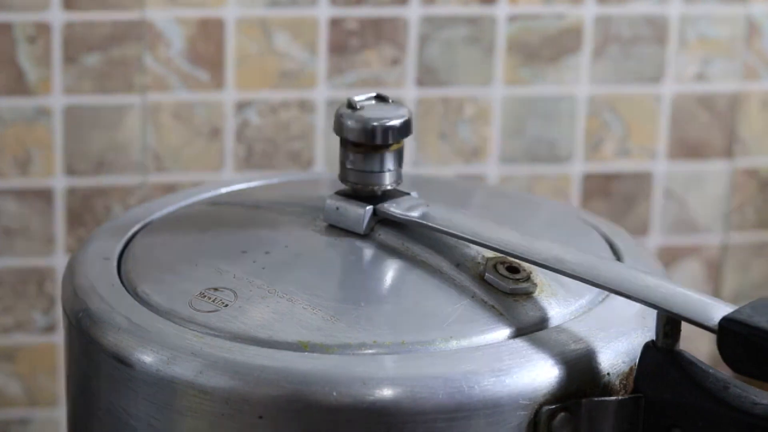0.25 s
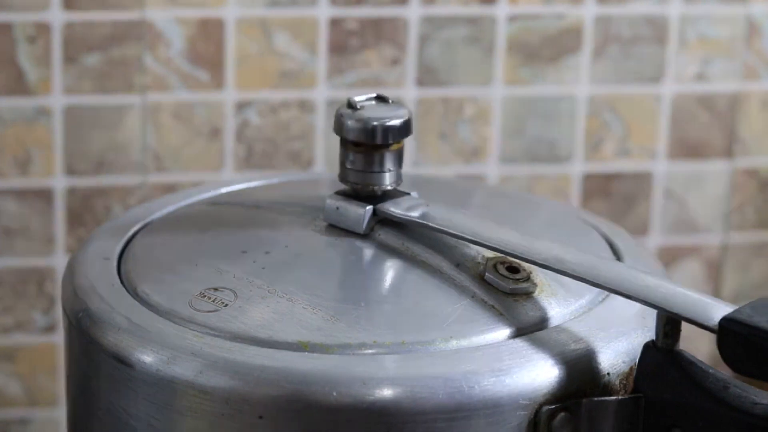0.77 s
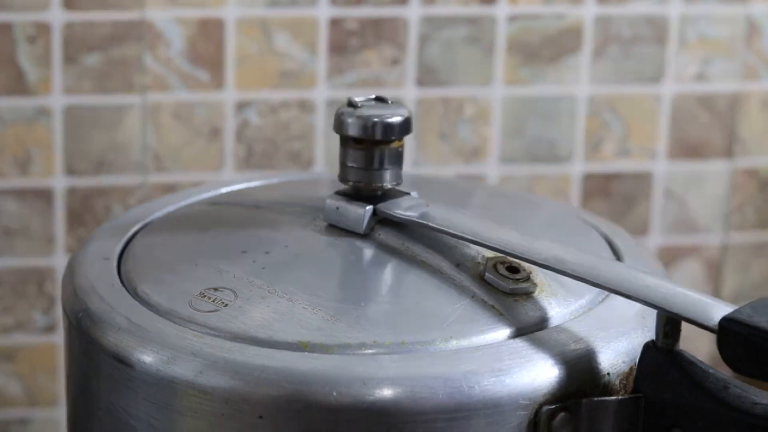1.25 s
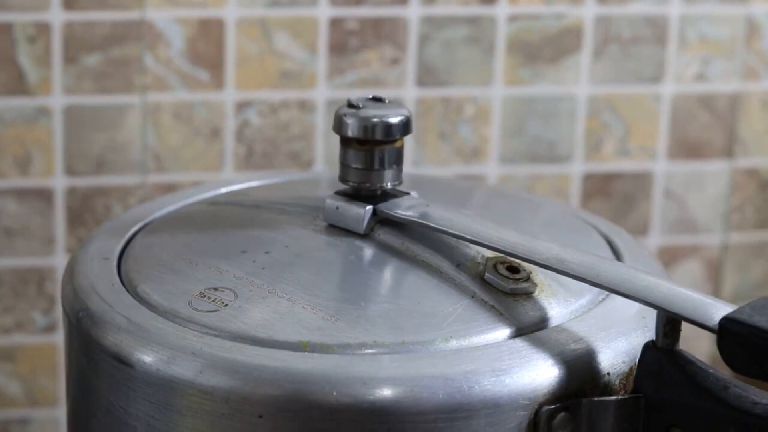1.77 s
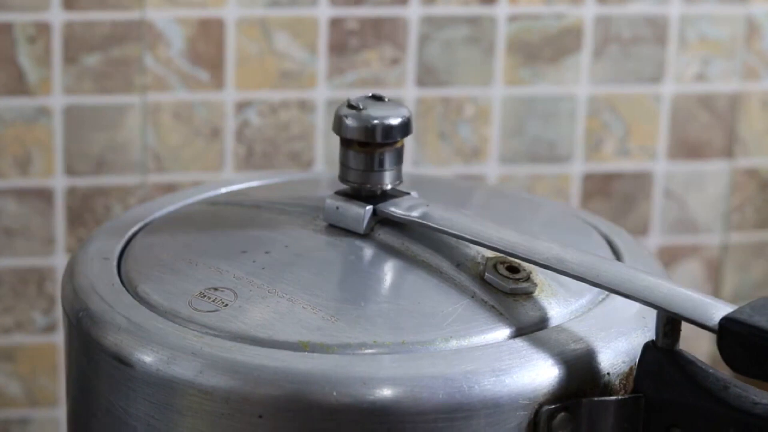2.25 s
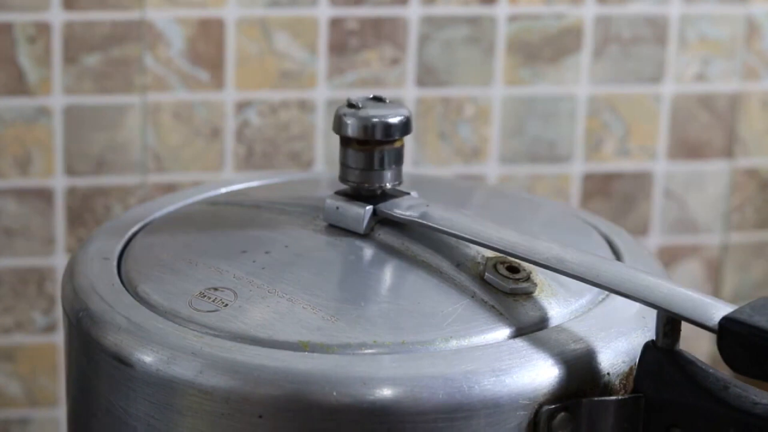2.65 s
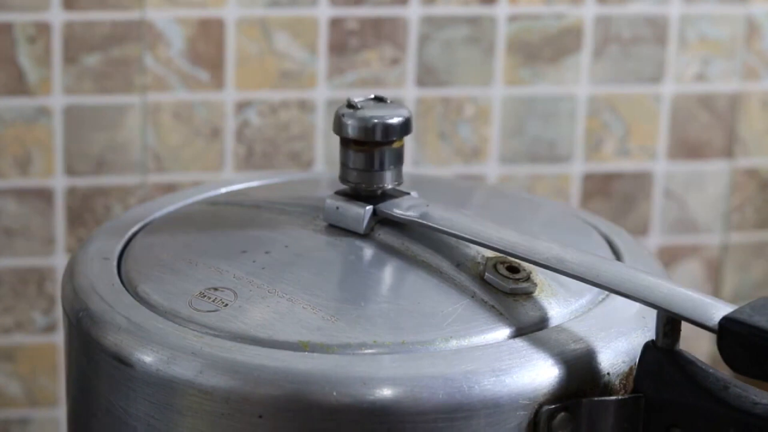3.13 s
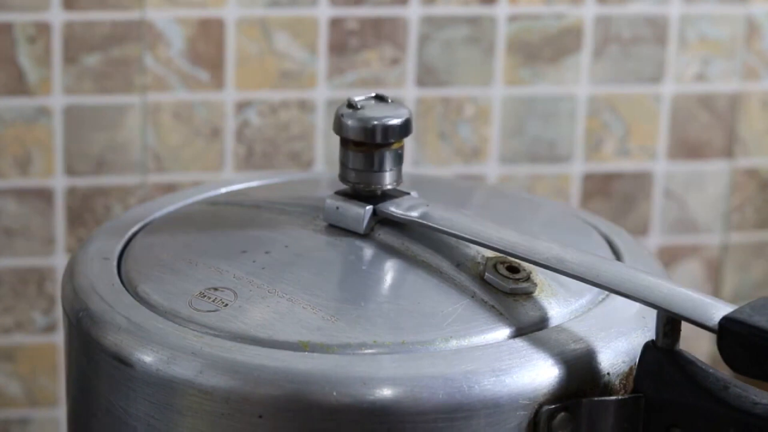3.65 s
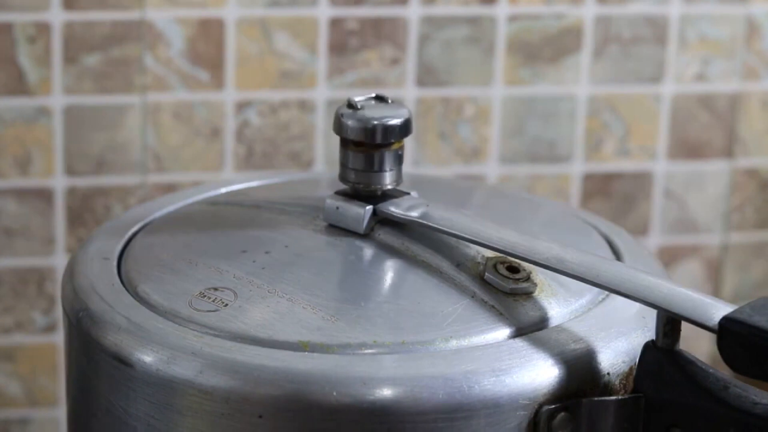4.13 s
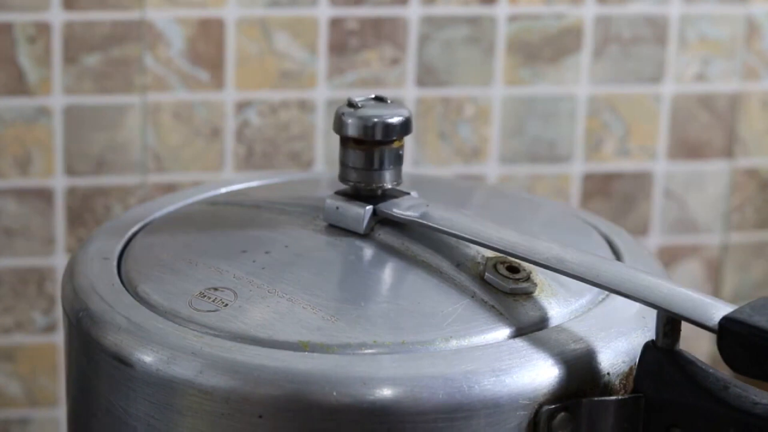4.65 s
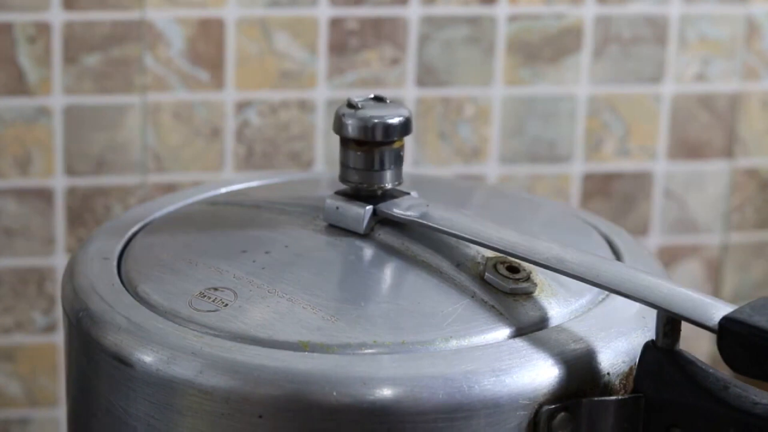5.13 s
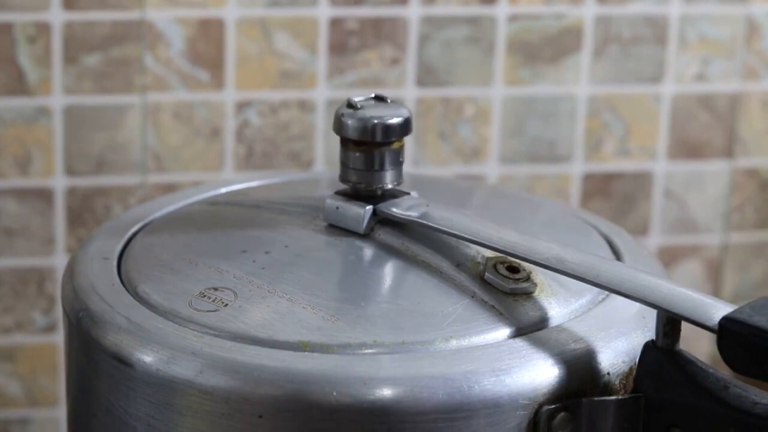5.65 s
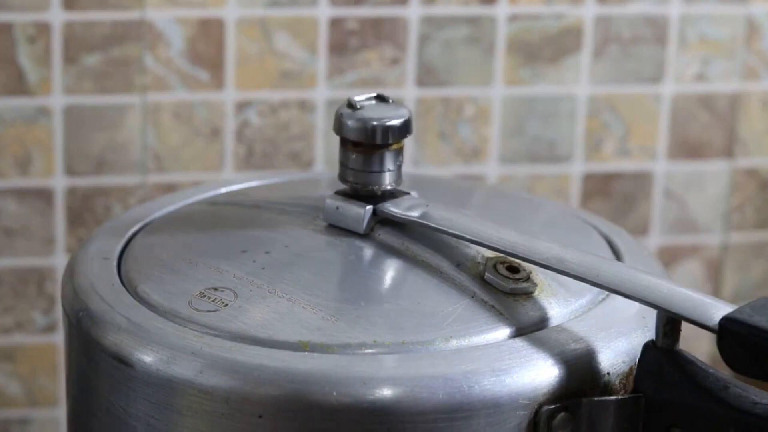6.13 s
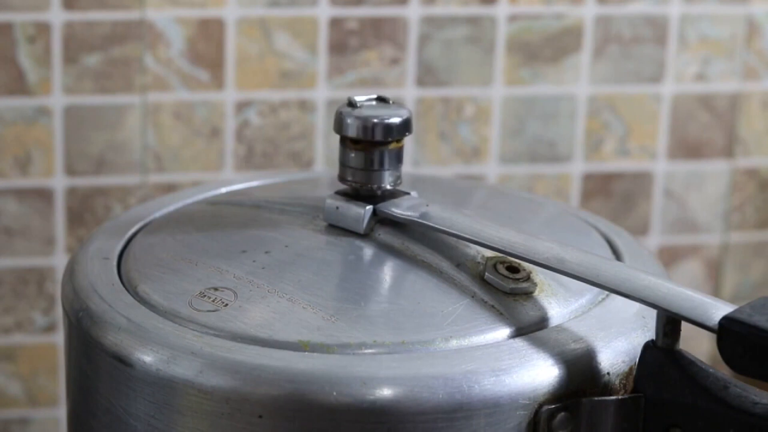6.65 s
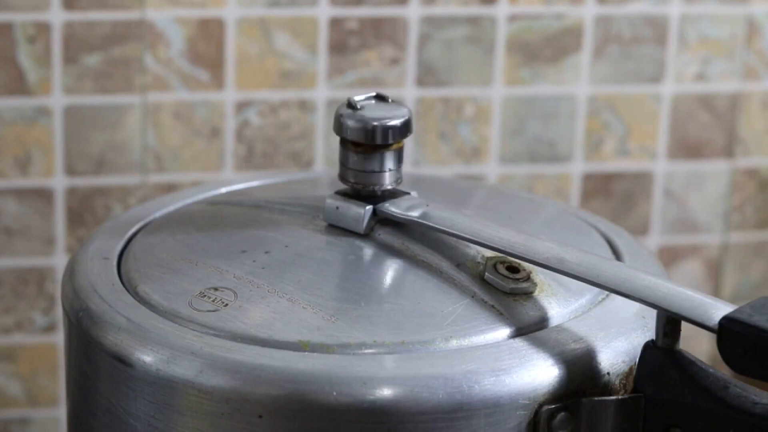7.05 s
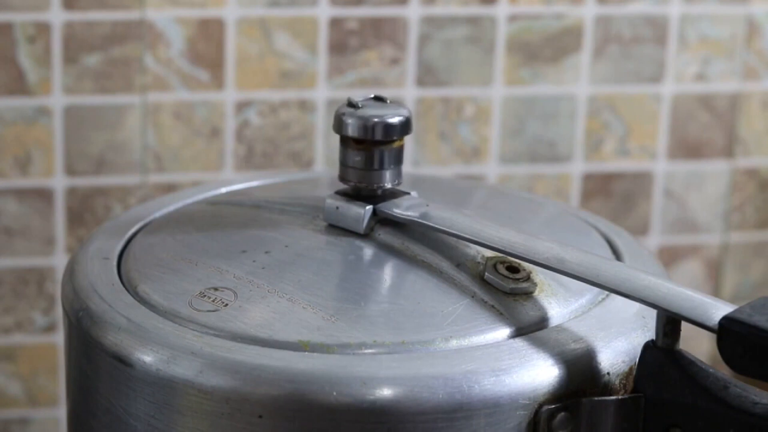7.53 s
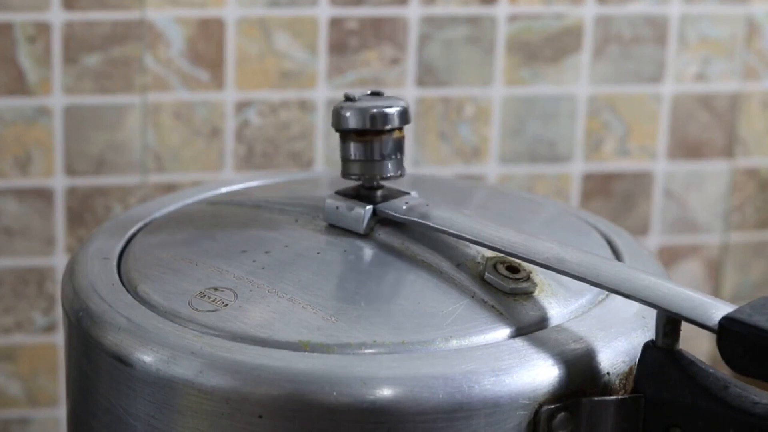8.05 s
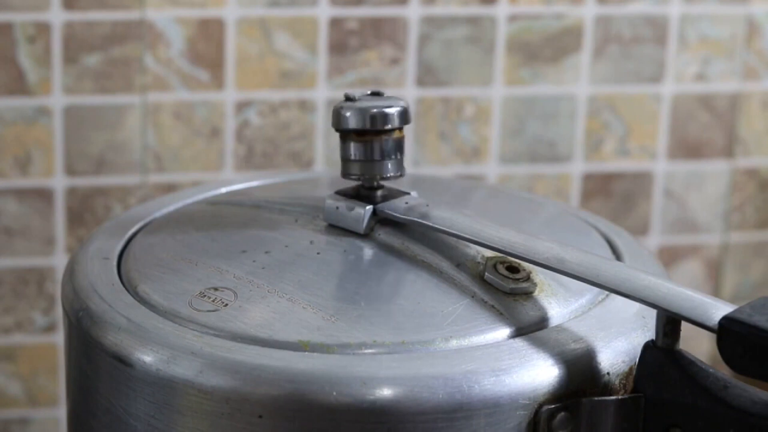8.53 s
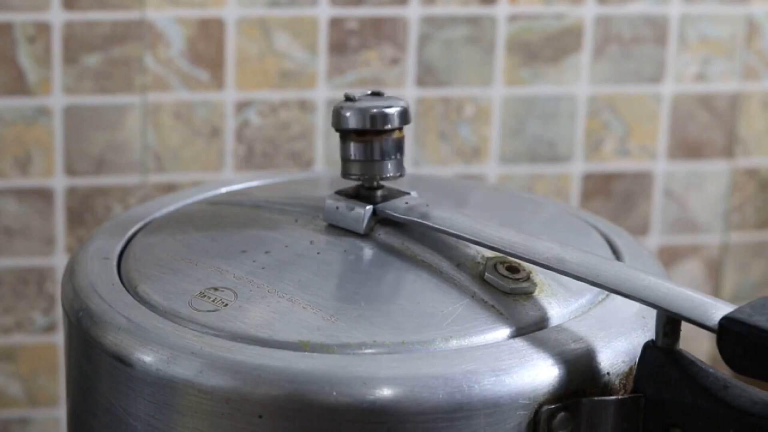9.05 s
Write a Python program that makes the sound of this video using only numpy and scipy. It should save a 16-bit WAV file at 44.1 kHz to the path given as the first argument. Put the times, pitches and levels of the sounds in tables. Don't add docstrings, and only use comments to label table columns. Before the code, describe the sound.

Close pressure cooker valve rocks, puffing steam in quick strong-and-weak hisses, then lifts into a steady loud blast over faint kitchen hum.

```python
import sys
import numpy as np
from scipy import signal
from scipy.fft import rfft, irfft
from scipy.io import wavfile
from scipy.ndimage import uniform_filter1d

SR = 44100
rng = np.random.default_rng(int(sys.argv[2]) if len(sys.argv) > 2 else 0)


def voltage_ratio(level):
    return 10 ** (np.asarray(level, float) / 20)


def int16_out(signal):
    q = np.round(np.clip(np.atleast_2d(signal).T, -1, 1) * 32767)
    wavfile.write(sys.argv[1], SR, q.astype(np.int16))


N = 409688
HZ = np.arange(N // 2 + 1) * SR / N + 1e-3
TIME = np.arange(N) / SR


def level(x, db):
    return x * voltage_ratio(db) / np.sqrt(np.mean(x ** 2))


def along(table):
    hz, value = np.transpose(table)
    return np.interp(np.log(HZ), np.log(np.maximum(hz, 1)), value)


def resonances(modes):
    return sum(db / (1 + (2 * (HZ - hz) / width) ** 2) for hz, width, db in modes)


def noise(db, alike=1):
    mid, side = rfft(rng.standard_normal((2, N)))
    alike = np.clip(alike, 0, 1)
    common = np.sqrt(1 + alike) * mid
    opposed = np.sqrt(1 - alike) * side * np.array([[1], [-1]])
    return level(irfft((common + opposed) * voltage_ratio(db), N), 0)


def walk(rate):
    k = int(SR / rate)
    held = np.repeat(rng.standard_normal(N // k + 1), k)
    return 1.28 * uniform_filter1d(uniform_filter1d(held, k), k)[:N]


# (frequency [Hz], density [dB per Hz])
LEAD = [(18, -38), (30, -18), (291, -4), (663, -13.5), (775, -30), (952, -16), (1060, -19), (14300, -49)]
# (frequency [Hz], density [dB per Hz])
HUSH = [(18, -46), (30, -16), (243, 3), (367, -6), (474, -5), (775, -15), (1550, -16), (14300, -45)]
LEAD_DB, HUSH_DB = -38, -60.5
TICK_S, HUSH_S = .018, .058
LEAD_TOP_HZ = 14400


def lead_in():
    hushed = np.clip((TIME - HUSH_S) / 0.0014, 0, 1)
    dull = -60 * (HZ > LEAD_TOP_HZ)
    loud_air = noise(along(LEAD) + dull, alike=0.52) * voltage_ratio(LEAD_DB) * (1 - hushed)
    hushed_air = noise(along(HUSH) + dull, alike=1.0) * voltage_ratio(HUSH_DB)
    tick_shape = np.exp(-((TIME - TICK_S) / 0.0011) ** 2)
    tick = noise(resonances([(5000, 7000, 32)])) * tick_shape * voltage_ratio(-42)
    return loud_air + hushed_air + tick


# (time [s], height [0-1])
LIFT = [
    (8.13, 0),
    (8.19, 0.43),
    (8.32, 0.47),
    (8.345, .98),
]


def height():
    return np.interp(TIME, *np.transpose(LIFT))


# (time seated [s], leak [dB], puff [dB], brightness [dB])
STRONG = [(0.1, -39, -22.5, 1.5), (0.382, -33.5, -21.6, -2.5), (0.686, -31.8, -22, 1),
          (0.983, -31.5, -21.5, 0), (1.258, -31, -22.1, 1.5), (1.562, -32, -22.5, 2), (1.856, -30, -23, 2),
          (2.115, -32.6, -20.5, -3), (2.392, -34.5, -22, 1.5), (2.651, -34, -22, -1),
          (2.917, -32.5, -21.5, -2.5), (3.205, -32.5, -21.5, -3.5), (3.502, -30.5, -21.5, -.3),
          (3.777, -36, -20.5, -2.5), (4.034, -33, -22, -1.5), (4.348, -32, -22, 0.5),
          (4.62, -32.5, -22, 2.1), (4.902, -31.5, -22, -2.5), (5.219, -30, -21, -1.5),
          (5.515, -32.5, -21.3, 0), (5.788, -34, -22.9, 3), (6.025, -33.5, -22.0, -1.5),
          (6.322, -31.1, -21.5, -2.5), (6.6, -30.5, -22.5, 0.5), (6.916, -34.5, -21.4, .6),
          (7.197, -32, -22, 3.5), (7.482, -31, -21.6, 1), (7.806, -30, -21.0, -1.5)]
# (time seated [s], leak [dB], puff [dB], brightness [dB])
WEAK = [(0.261, -35.5, -25, -2), (0.557, -36.5, -26.5, -.3), (0.854, -32, -22, -.8),
        (1.14, -32.5, -24.9, 2), (1.434, -34.5, -24.5, -2), (1.721, -32.5, -22.5, -2),
        (2.005, -28.7, -23, -1.5), (2.279, -29.5, -22.5, -1.5), (2.534, -33.2, -22.5, .3),
        (2.82, -31, -24, 0.5), (3.092, -35, -25, .3), (3.38, -32, -23.8, 2), (3.647, -28.5, -22.5, 1.5),
        (3.92, -30.5, -25.5, -0.5), (4.229, -36.5, -23, 2.5), (4.518, -33.5, -24, -3),
        (4.782, -33, -25.5, 1), (5.094, -32.5, -22.6, -.4), (5.379, -31, -22.5, 0.5),
        (5.653, -29, -22.9, 0), (5.934, -34, -27.5, 0), (6.201, -32, -24.5, 2.5), (6.479, -33, -25.4, .6),
        (6.786, -32, -23.7, 0.5), (7.065, -35.1, -23.4, -2), (7.369, -34.2, -24, -2.5),
        (7.671, -34.5, -22.5, -.6), (7.974, -30.5, -24, .3)]
# (time [s], jet level [dB])
BLAST = [
    (8.1, -34.5),
    (8.125, -22),
    (8.17, -20),
    (8.3, -22.2),
    (8.59, -22),
    (8.615, -26),
    (8.65, -22),
    (8.92, -23),
    (9.29, -23.5),
]
STRONG_OPENS, STRONG_CLOSES, WEAK_OPENS, WEAK_CLOSES = 0.25, .6, 0.36, 0.6
TOP_DB = -1.5


def valve():
    seated, leak_db, puff_db, bright_db = np.reshape(np.hstack([STRONG, WEAK]), (-1, 4)).T
    blast_s, blast_db = np.transpose(BLAST)
    length = np.diff(np.r_[seated, blast_s[0]])
    opened = seated + length * np.resize([STRONG_OPENS, WEAK_OPENS], len(seated))
    closing = seated + length * np.resize([STRONG_CLOSES, WEAK_CLOSES], len(seated))
    puff_times = np.ravel([seated, opened, closing], "F")
    puff_levels = np.ravel([leak_db, puff_db, puff_db], "F")
    flow = np.interp(TIME, np.r_[puff_times, blast_s], np.r_[puff_levels, blast_db])
    bright = np.interp(TIME, np.r_[opened, blast_s[1]], np.r_[bright_db, 0])
    inertia = int(.015 * SR)
    return uniform_filter1d(flow, inertia), bright + TOP_DB * height()


def nearby(t60_s=0.19, wet_db=-9):
    t = np.arange(SR // 5) / SR
    echoes = rng.standard_normal((2, len(t))) * voltage_ratio(-60 * t / t60_s) * (t > .001)
    echoes = echoes * voltage_ratio(wet_db) / np.sqrt(np.sum(echoes ** 2, axis=1, keepdims=True))
    return (1 + rfft(echoes, N)) / np.sqrt(1 + voltage_ratio(2 * wet_db))


def tiles(gain, t60_s, wet):
    keep = voltage_ratio(-120 / (t60_s * SR))
    lingering = signal.lfilter([1 - keep], [1, -keep], gain ** 2)
    return np.sqrt((1 - wet) * gain ** 2 + wet * lingering)


# (frequency [Hz], density [dB per Hz])
JET = [(500, -32), (750, -18), (930, -18.5), (990, -10.5), (1300, -10), (1590, -9), (1900, -6),
       (2270, -8.5), (2600, -3), (3040, -7), (5380, -8.5), (7100, -2.5), (13700, -12), (15700, -16.5)]
# (frequency [Hz], width [Hz], lift [dB])
CAP = [(987, 21, 4), (1242, 94, 3.5), (1484, 16.4, 2), (1920, 120, 2), (2150, 50, 3), (2690, 130, -0.5),
       (3520, 200, 3.5), (6330, 45, 7), (6700, 45, 2), (6980, 45, 1), (7150, 60, 3.5), (7590, 35, 5),
       (7770, 71, 2), (8130, 100, .5)]
# (frequency [Hz], left minus right [dB])
SIDES = [(700, 1), (1500, -3.5), (3000, -1.5), (6000, -1.8), (10000, -0.5), (15000, -1)]
# (frequency [Hz], share common to both ears [0-1])
ALIKE = [(700, 1), (1200, 0.35), (4000, .4), (8000, 0.26), (13000, 0.47)]
LID_DB, CAP_DB = -7.5, -4


def steam():
    flow, bright = valve()
    lid, cap = LID_DB * height(), CAP_DB * height()
    sides = along(SIDES) / 2 * np.array([[1], [-1]])
    jet = noise(along(JET) + resonances(CAP) + sides, alike=along(ALIKE))
    spitting = jet * voltage_ratio(.5 * walk(400) + 1.25)
    jet = rfft(spitting) * nearby()
    out = 0
    for octave in np.arange(-.5, 4.6, .5):
        band = np.cos(np.pi * np.clip(np.log2(HZ / 800) - octave, -.5, .5)) ** 2
        swing = np.interp(octave, [0, 1.5, 3, 4.5], [.72, 1.04, .98, 1.36])
        top = np.interp(octave, [3.1, 4.1], [0, 1.1])
        lid_share = np.interp(octave, [.5, 1.5], [1, 0])
        cap_share = np.interp(octave, [.5, 1.5, 1.9, 2.5], [0, 1, 1, 0])
        thin = lid_share * lid + cap_share * cap
        flicker = .5 * walk(20) + .7 * walk(6)
        db = -24 + swing * (flow + 24) + top * bright + thin + flicker
        gain = tiles(voltage_ratio(db), t60_s=.28 - .025 * octave, wet=.25)
        out = out + gain * irfft(jet * band, N)
    return out


# (frequency [Hz], density [dB per Hz])
AIR = [(12, -36), (20, -4.5), (92, -5.5), (202, -4.5), (265, -0.5), (318, -4.5), (370, -2), (526, -5),
       (643, -1.5), (748, -6.5), (1100, -10), (1430, -9), (2420, -120)]
# (frequency [Hz], width [Hz], lift [dB])
ROOM_MODES = [(48, 9.6, 11), (60, 10, -5), (20, 16, -2), (228, 9.9, -7.5), (161, 5.6, 5), (258, 19, 2),
              (272, 13, 0.5), (372.2, 18, 8), (452, 32, 5.5)]
# (time [s], held [s], level [dB])
SWELLS = [(.22, .78, -53.5), (1.13, 0.067, -53), (1.29, 0.13, -55), (1.56, 0.036, -56), (1.72, 0.018, -56),
          (1.88, 0.15, -58), (2.16, 0.19, -54), (2.64, 0.4, -60), (3.2, 0.54, -57), (3.91, 0.42, -55.5),
          (4.61, .04, -54), (4.84, .04, -54), (5.26, 0.31, -54), (5.71, .05, -49), (5.87, 0.28, -58),
          (6.25, 0.087, -49), (6.47, 0.17, -48.5), (6.76, .34, -53), (7.26, 0.4, -50.5), (7.78, .06, -41.5),
          (8.01, 0.11, -45)]
AIR_DB, AIR_WANDER_DB = -43, 1.1
DRONE_HZ, DRONE_WIDTH_HZ, DRONE_DB = 97.3, 4.9, -66.5
SWELL_S = 0.041
DUCK_DB = -11


def kitchen():
    air = noise(along(AIR) + resonances(ROOM_MODES), alike=np.interp(HZ, [300, 900], [.9, .6]))
    air = air * voltage_ratio(AIR_DB + AIR_WANDER_DB * walk(12))
    waver_db = -20 * np.log10(1 + (2 * (HZ - DRONE_HZ) / DRONE_WIDTH_HZ) ** 2)
    waver = noise(waver_db, alike=0.79)
    drone = level(.22 * waver + np.cos(2 * np.pi * DRONE_HZ * TIME), 0)
    swell = 0
    for s, held, db in SWELLS:
        outside = np.maximum(np.maximum(s - TIME, TIME - s - held), 0)
        swell = swell + voltage_ratio(db) * np.exp(-(outside / SWELL_S) ** 2)
    duck = voltage_ratio(DUCK_DB * height() ** 0.64)
    return (air + drone * (voltage_ratio(DRONE_DB) + swell)) * duck


def scene():
    change_s = .1385
    cooker = np.clip((TIME - change_s) / .0018 + 1, 0, 1) ** 3
    return lead_in() * (1 - cooker) + (steam() + kitchen()) * cooker


def band_limit(x):
    return signal.sosfilt(signal.butter(12, 15735, fs=SR, output="sos"), x)


def record(dry):
    return band_limit(dry)


dry = scene()
out = record(dry)
int16_out(out)
```